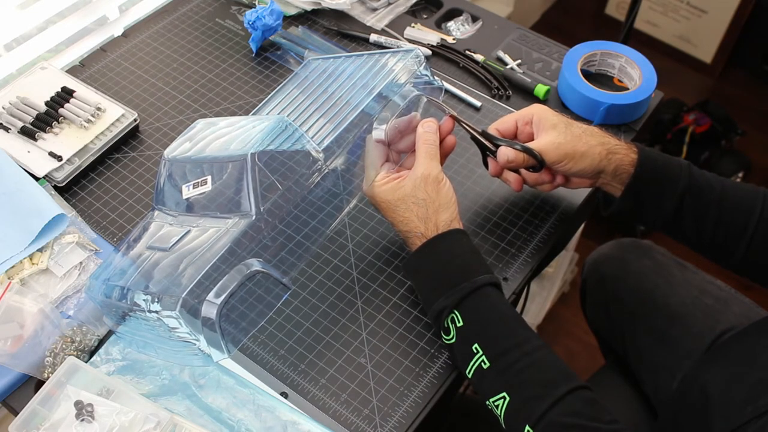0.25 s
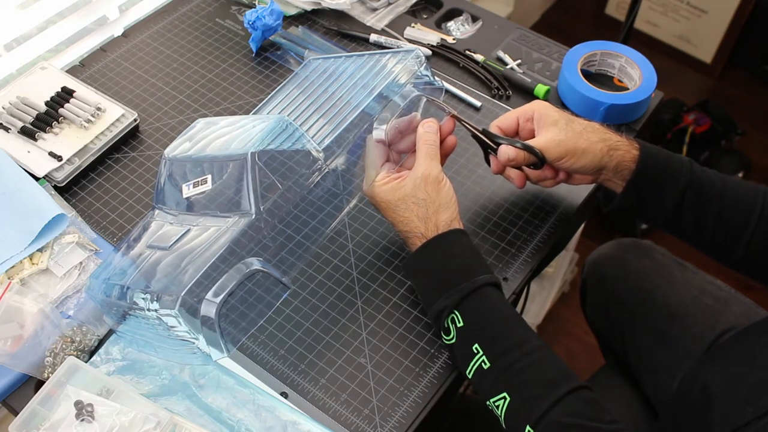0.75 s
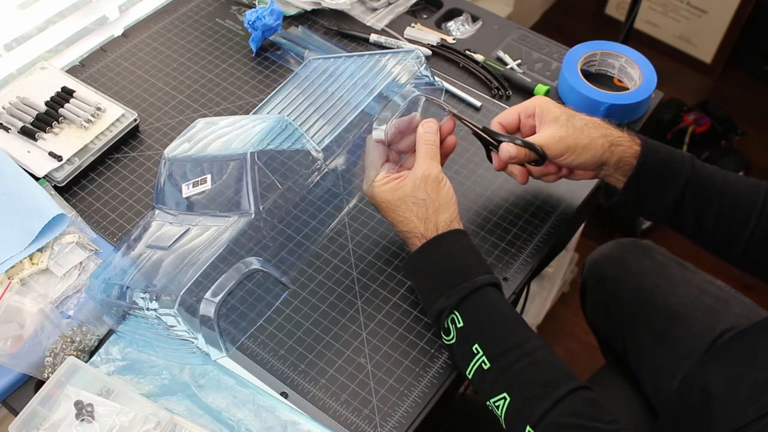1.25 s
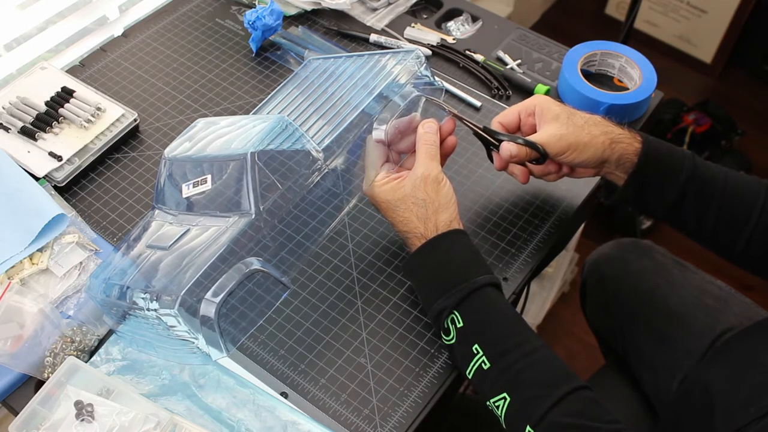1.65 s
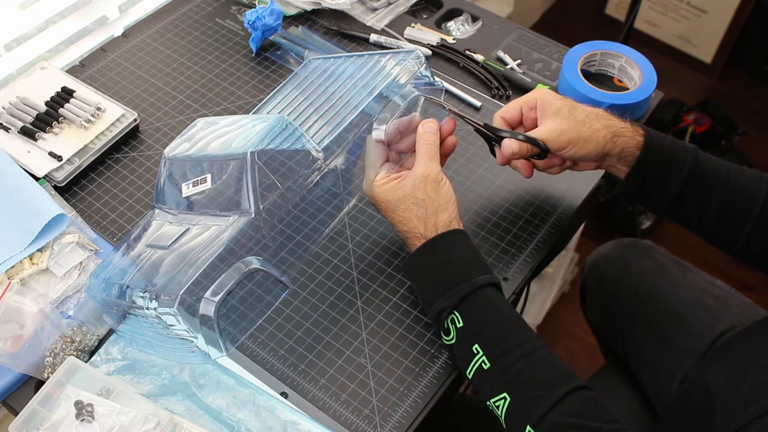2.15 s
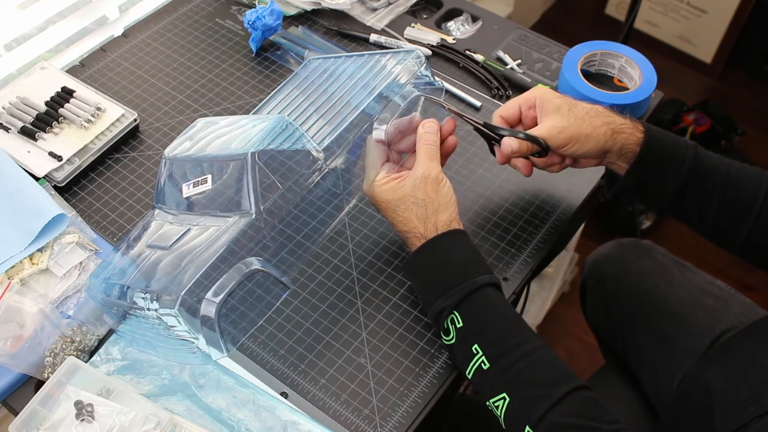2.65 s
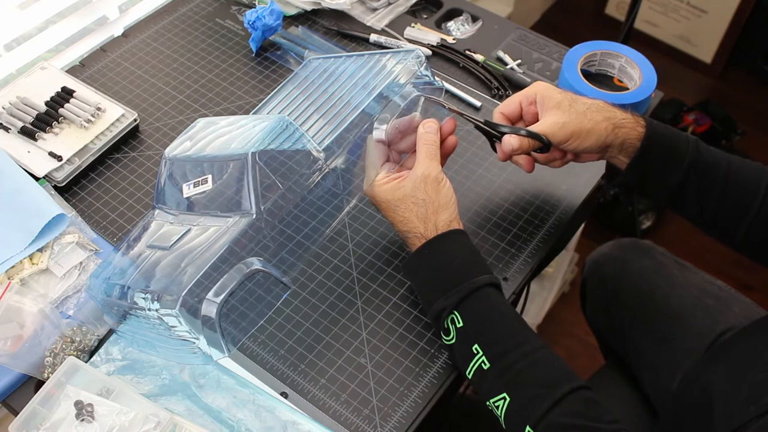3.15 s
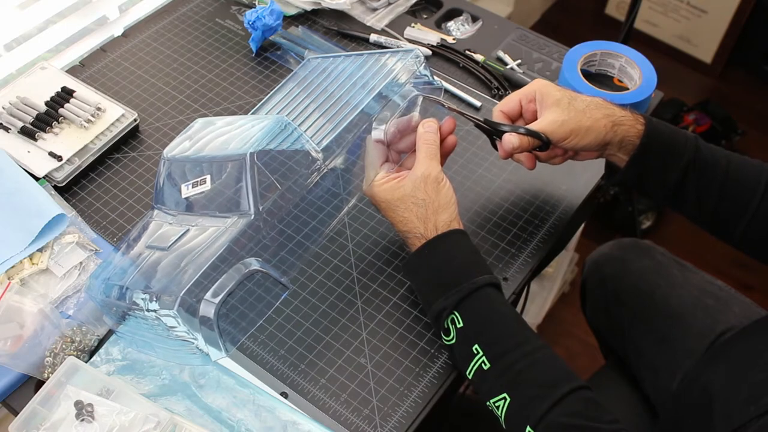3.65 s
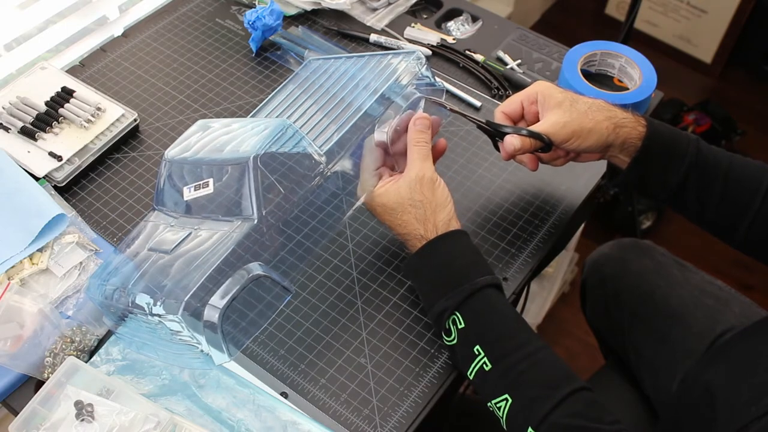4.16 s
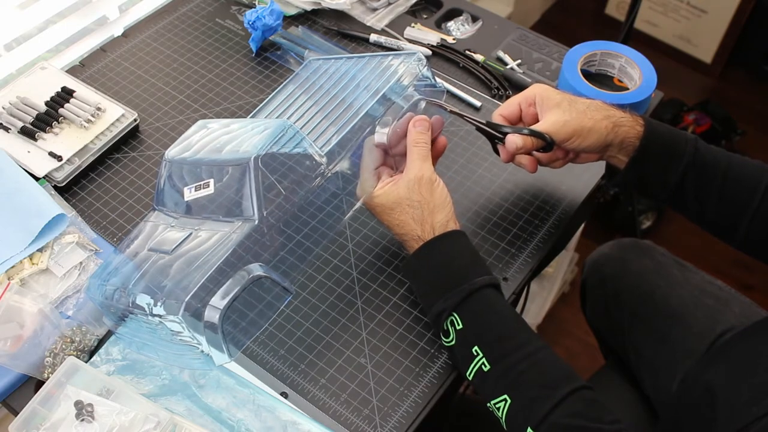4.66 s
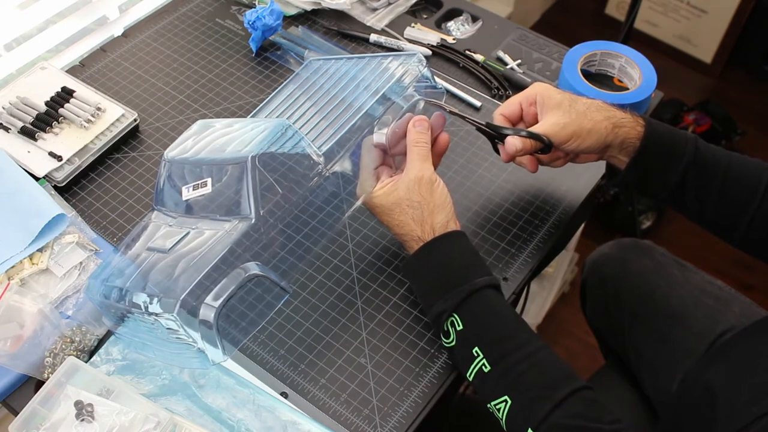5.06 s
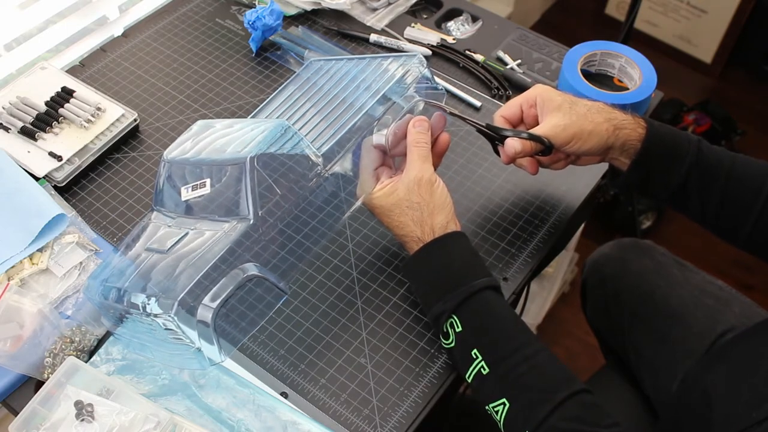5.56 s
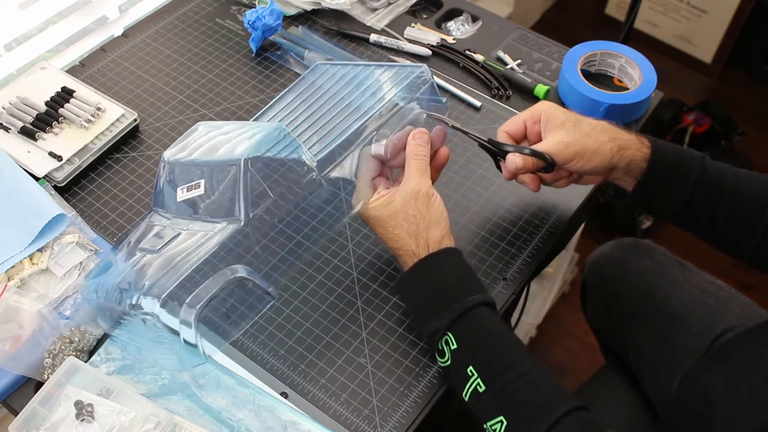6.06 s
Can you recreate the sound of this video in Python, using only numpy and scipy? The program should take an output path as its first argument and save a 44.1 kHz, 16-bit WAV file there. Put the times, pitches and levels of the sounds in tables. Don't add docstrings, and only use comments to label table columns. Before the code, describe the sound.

Close view of small scissors cutting a thin, hollow plastic shell on a workbench. Dull knocks and tiny ticks come in scattered clusters, with brief bright rasps and sharp cracks. Stronger bites come past the middle, then a sparse lull, then the loudest hollow rattle at the end. Quiet room, faint steady fan hum, light reverberation and soft microphone hiss.

```python
import sys
import numpy as np
from scipy import signal
from scipy.io import wavfile
from scipy.ndimage import uniform_filter1d

SR = 44100
rng = np.random.default_rng(int(sys.argv[2]) if len(sys.argv) > 2 else 0)


def ratio(d):
    e = np.asarray(d, float) / 20
    return 10 ** e


def file_out(sig):
    cols = np.atleast_2d(sig).T
    lim = np.clip(cols, -1, 1)
    pcm = np.round(lim * 32767).astype(np.int16)
    wavfile.write(sys.argv[1], SR, pcm)


N = 277389


def evened(x):
    return x / np.sqrt(np.mean(x ** 2) + 1e-20)


def read(points, hz):
    f, value = np.transpose(points)
    return np.interp(np.log(hz + 1), np.log(f + 1), value)


def add(mix, s, sound):
    part = mix[..., round(s * SR):][..., :sound.shape[-1]]
    part += sound[..., :part.shape[-1]]


def band(x, low_hz, high_hz):
    edges = np.clip([low_hz, high_hz], 20, 0.4 * SR)
    return signal.sosfilt(signal.butter(2, edges, "bandpass", fs=SR, output="sos"), x)


def drift(rate_hz):
    t = np.arange(0, N + 256, 256) / SR
    rates = np.geomspace(rate_hz / 20, rate_hz, num=12)
    slow = sum(np.sin(2 * np.pi * (f * t + rng.random())) / np.sqrt(f) for f in rates)
    return np.interp(np.arange(N) / SR, t, evened(slow))


def air(spectrum, patchy_db, swell_db):
    frames, hz = N // 512 + 5, np.fft.rfftfreq(2048, 1 / SR)
    a, b, patches = rng.standard_normal((frames, len(hz), 3)).T
    patches = uniform_filter1d(patches, size=12, axis=0)
    patches = evened(uniform_filter1d(patches, size=8, axis=1))
    swell = np.resize(drift(4)[::512], frames) / (1 + (hz[:, None] / 1200) ** 2)
    level_db = read(spectrum, hz)[:, None] + patchy_db * patches + swell_db * swell
    z = (a + 1j * b) * ratio(level_db)
    return evened(signal.istft(z, nperseg=2048, noverlap=1536)[1][:N])


# (frequency [Hz], density [dB per Hz])
HISS_SPECTRUM = [(15, -21), (25, 0), (363, -10.5), (439, -11.5), (962, -11), (12900, -9), (16000, -11.5)]


def hiss():
    return ratio(-58.5) * air(HISS_SPECTRUM, patchy_db=0, swell_db=0)


# (frequency [Hz], density [dB per Hz])
TONE_SPECTRUM = [(15, -33), (25, -33), (141, -8.5), (277, -1), (335, -8), (394, -4), (439, -4.5), (516, -1),
                 (641, -9), (840, -7), (962, -12), (1790, -16.5), (2910, -23), (13200, -27), (16000, -27.5)]


def room_tone():
    return ratio(-48.5) * air(TONE_SPECTRUM, patchy_db=1.83, swell_db=-2.35)


# (frequency [Hz], level [dB rms])
FAN_LINES = [(48.4, -66.5), (290.7, -61.5), (387.6, -55.5), (495.3, -63), (1712, -72.5), (1820, -69.5),
             (2030, -95.5)]


def fan():
    t = np.arange(N) / SR
    hum = np.zeros(N)
    for hz, db in FAN_LINES:
        level = ratio(db + 0.5 + 1.05 * drift(15))
        hum += level * np.sin(2 * np.pi * hz * t + 0.82 * drift(2.5))
    return hum


# (peak time [s], level [dB], swell [s])
THUMPS = [
    (3.43, -53, 0.041),
    (3.71, -49, 0.058),
    (3.9, -39, 0.033),
    (6.16, -40, 0.073),
]


def bench():
    t = np.arange(N) / SR
    level = ratio(-63 + 0.5 * drift(8))
    for s, db, swell in THUMPS:
        level += ratio(db) * np.exp(-((t - s) / swell) ** 2)
    rumble = band(rng.standard_normal(N), 31.4, 110)
    return level * evened(band(rumble, 31.4, 122))


# (frequency [Hz], reverberation time t60 [s])
ROOM_DECAY = [(120, 0.73), (350, 0.49), (900, 0.72), (2300, 0.69), (6000, 0.56), (14000, 0.13)]


def room(x):
    taps = np.zeros((3, SR // 2))
    at = np.arange(160, SR // 2 - 20, 20)
    places = at + rng.integers(0, 20, (3, len(at)))
    np.put_along_axis(taps, places, rng.choice([-1., 1.], (3, len(at))), axis=1)
    hz, t, z = signal.stft(taps, SR, nperseg=256)
    tails = signal.istft(z * ratio(-60 * t / read(ROOM_DECAY, hz)[:, None]), SR, nperseg=256)[1]
    phase = 5 * np.arange(N) / SR + np.arange(3)[:, None] / 3
    turn = np.sqrt(2 / 3) * np.cos(2 * np.pi * phase)
    return signal.fftconvolve(x * turn, tails / np.linalg.norm(tails[0]), axes=1)[:, :N].sum(0)


def spray(t, luck, grit_db, rise, t60, hold):
    noise, grit = luck
    grains = noise * ratio(grit_db * evened(uniform_filter1d(grit, size=30)))
    return grains * (1 - np.exp(-t / rise)) * ratio(-60 * (t / t60) ** hold)


# (time [s], peak level [dB], centre frequency [Hz], rise [s], t60 [s])
SHEARS = [(0.274, -34.5, 3700, 0.016, 0.15), (.535, -49, 11100, .01, .11), (.959, -35, 4440, .034, 0.081),
          (1.756, -32, 4520, 0.025, 0.09), (2.549, -32, 9000, 0.0092, 0.032),
          (3.379, -27.5, 5060, 0.0066, 0.067), (3.871, -26, 6900, .0061, 0.08),
          (3.906, -42.5, 8100, .01, 0.075), (3.97, -40, 8000, .0052, 0.049), (5.72, -35.5, 6750, 0.78, 1.1),
          (6.095, -37, 5900, .02, 0.13)]


def shears():
    out, t = np.zeros(N), np.arange(SR // 3) / SR
    spread = 2 ** 0.99
    for s, db, hz, rise, t60 in SHEARS:
        luck = rng.standard_normal((2, len(t)))
        rasp = spray(t, luck, grit_db=0.5, rise=rise, t60=t60, hold=1.5)
        add(out, s, ratio(db) * band(rasp, hz / spread, hz * spread))
    return out


# (time [s], high part level [dB], low over high [dB], middle over high [dB], t60 [s])
CRACKS = [(.143, -48, -0.5, -17, 0.02), (.326, -41, 2, -6, 0.021), (1.7837, -51, -1, -14, 0.017),
          (2.5586, -33.5, 3, -12, 0.019), (3.146, -59, 12.5, -12, 0.027), (3.588, -28, -11, -5, 0.018),
          (3.8693, -33.5, 5.5, -16, 0.023), (3.8882, -38, 4.5, -8, 0.033), (3.915, -54, 8, 0, 0.033),
          (3.95, -58, 10, -3, .026), (4.029, -47, 4, -24, 0.04), (4.769, -50.5, -2.5, -19, .026),
          (5.255, -52, -9, 1, 0.02), (6.0668, -54.5, 3, -14, 0.055), (6.0887, -60, 7, -2, .036),
          (6.1186, -45.5, -3, -3, 0.021), (6.1319, -54, 8, -7, .023), (6.1542, -55.5, 5, 6, 0.021),
          (6.1822, -68, 9, 8, .026), (6.203, -61, -1, -3, 0.03)]
# (time [s], high part level [dB], low over high [dB])
TICKS = [(0.439, -51.5, -0.5), (.5483, -50.5, -7), (.5648, -56, -1), (0.9912, -57.5, 5), (1.1123, -55, -11),
         (1.1696, -57, -3), (1.2487, -59, -3), (1.3503, -59, -4), (1.9854, -59, -11), (2.129, -52.5, -3.5),
         (2.2146, -60, -10), (2.538, -47, -5), (2.7661, -53, -6), (2.841, -54, -12), (2.8621, -57, -13),
         (3.578, -49, -4), (3.583, -40, -6), (4.7526, -63, 3)]
CRACK_EDGES = (2500, 6000, 9500, 14500)


def cracks():
    out, t = np.zeros(N), np.arange(SR // 10) / SR
    crack_snap, tick_snap = 5.3, 18
    tick_middle_db, tick_t60 = -21, 0.03
    rows = [(*row, crack_snap) for row in CRACKS]
    rows += [(*row, tick_middle_db, tick_t60, tick_snap) for row in TICKS]
    for s, db, low_db, middle_db, t60, snap in rows:
        luck = rng.standard_normal((2, len(t)))
        burst = spray(t, luck, grit_db=7.0, rise=0.00019, t60=t60, hold=2.1)
        burst[4] += snap
        burst /= np.sqrt(np.mean(burst[:260] ** 2))
        parts = zip((low_db, middle_db, 0), CRACK_EDGES, CRACK_EDGES[1:])
        for k, (part_db, low, high) in enumerate(parts):
            per_width = np.sqrt(SR / 2 / (high - low))
            add(out, s, (-1) ** k * ratio(db + part_db) * band(burst, low, high) * per_width)
    return out


# (time [s], peak level [dB], deep modes [dB], hardness [dB])
TAPS = [(.043, -33.5, -1, -8), (.144, -32, -21, -26), (.151, -21.5, -9, -19), (.326, -25, 1, -1.5),
        (.334, -29.5, -21, 2), (.44, -34, -2, -6), (.454, -33, 1, -19), (.562, -32, -17, -17),
        (.582, -29.5, -34, -33), (1.109, -32, -19, -15.5), (1.176, -30.5, -12, -13.5),
        (1.248, -34, -12, -13), (3.861, -26, 15, -9), (1.787, -26.5, -3, -0.5), (1.812, -30.5, 2.5, -5.5),
        (2.134, -46, -5, -8), (2.338, -20.5, -7, -21.5), (2.366, -24, -14, -29), (2.539, -35, -22, -3.5),
        (2.558, -21.5, -7, -1), (1.586, -30, -14, -28), (3.145, -28.5, -11, -17), (4.031, -25, 0.5, -14),
        (4.256, -35, 4, -8.5), (4.749, -29, 0, -17), (4.77, -31.5, -4, -13), (5.604, -36.5, -5, -16),
        (5.821, -39, -33, -25), (5.911, -31, -24, -29), (6.015, -13.5, 0, -30)]
# (start time [s], length [s], force [dB], deep modes [dB], hardness [dB])
CHATTERS = [
    (0.268, .05, -20, -45, -15.5),
    (1.759, 0.024, -38, -2, 4),
    (3.38, 0.033, -10.5, -3, -8),
    (6.058, 0.025, -14, 4.5, -17.5),
    (6.084, 0.029, -8, -11, -17),
    (6.179, 0.045, -20, 0, -15),
]
# (start time [s], length [s], force [dB], deep modes [dB], hardness [dB])
RATTLES = [
    (0.959, 0.056, -28.5, -15.5, -13.5),
    (1.558, .012, -19, -6, -26),
    (3.676, 0.021, -20, 3.5, -14),
    (3.868, 0.049, -10.5, 0.5, -9.5),
    (6.131, 0.039, -4.5, -5, -19),
    (.352, 0.0091, -27, 3, -26),
]


def blows():
    rows = list(TAPS)
    runs = [(*row, -6, 0.44, 0) for row in CHATTERS]
    runs += [(*row, -1.5, 0.17, -4) for row in RATTLES]
    let_go_db = -32
    for s, length, db, deep_db, hard_db, first_db, bite, sag_db in runs:
        gap_luck, force_luck = rng.standard_normal((2, 6))
        gaps = 0.011 * np.exp(0.149 * gap_luck)
        after = np.cumsum(gaps) - gaps[0]
        force_db = np.interp(after / length, [0, bite, 1, 1.4], [first_db, 0, sag_db, let_go_db])
        levels_db = db + force_db + 0.5 * force_luck
        rows += [(s + a, level_db, deep_db, hard_db) for a, level_db in zip(after, levels_db)]
    return rows


# (frequency [Hz], level [dB], t60 [s])
SHELL_MODES = [(114, -18.5, 0.3), (146, -12.5, 0.11), (218.7, -5.5, 0.061), (256.8, -5, .12),
               (310.7, -1, 0.083), (354, -2, 0.064), (418.4, -4, 0.15), (442, -6.5, 0.074),
               (547, 0.5, 0.069), (618, -3, 0.26), (706.5, -1.5, 0.086), (747, -3.5, 0.073),
               (830, -4.5, 0.21), (889.4, 1.5, 0.1), (970, 1.5, 0.061), (1087, -6, 0.19),
               (1163, -0.5, 0.063), (1229, -2, 0.096), (1320, 5.5, 0.042), (1357, -1, 0.078),
               (1451, 2.5, 0.029), (1570, 0.5, 0.051), (1735, -2.5, 0.037), (1940, -4.5, 0.025),
               (2160, 3.5, 0.013), (2337, -8.5, 0.027), (2620, -0.5, 0.0074), (3030, -10, 0.015),
               (3560, -12, 0.019)]
BLOW_HZ = (305, 490, 784, 1540, 3200)


def shell():
    hz, mode_db, t60 = np.transpose(SHELL_MODES)[:, :, None]
    out, n, t = np.zeros(N), np.arange(900), np.arange(SR // 7) / SR
    boom_hz, boom_db, boom_t60 = 482.8, 4, 0.1
    for s, db, deep_db, hard_db in blows():
        if db < -50:
            continue
        grip, lean = rng.standard_normal(2)
        place, bend = rng.standard_normal((2, len(hz), 1))
        slips = 0.024 * rng.standard_normal(len(n)) ** 3 * np.exp(-n / (0.0059 * SR))
        slips[0] = 1

        beside_db = 0.26 * hard_db
        middle_db = hard_db + 3.5 * lean
        upper_db = hard_db - 1 - 3.5 * lean
        colours = (deep_db, beside_db, middle_db, upper_db, upper_db + 3.5)
        colour_db = read(list(zip(BLOW_HZ, colours)), hz)

        decay = ratio(mode_db + colour_db + place - 60 * t / t60)
        modes = decay * np.sin(2 * np.pi * hz * (1 + 0.016 * bend) * t)
        ring = (np.sign(bend) * modes).sum(0)
        boom = ratio(boom_db - 60 * t / boom_t60) * np.sin(2 * np.pi * boom_hz * (1 + 0.011 * grip) * t)
        rise = 1 - np.exp(-t / (0.0005 * ratio(-upper_db / 2)))
        add(out, s - 0.001, ratio(db - 10) * signal.fftconvolve(rise * (boom + ring), slips))
    return signal.sosfilt(signal.butter(3, 90, "highpass", fs=SR, output="sos"), out)


def scene():
    body, cut = shell(), cracks() + shears()
    middle = body + cut + room(ratio(-7) * body + ratio(-12) * cut)
    middle += room_tone() + fan() + bench()
    side = hiss()
    return np.array([middle + side, middle - side])


def roll_off(x):
    return signal.sosfilt(signal.butter(12, 16470, fs=SR, output="sos"), x)


def record(dry):
    low_pass = signal.firwin(1501, 15800, window=("kaiser", 9), fs=SR)
    limited = signal.oaconvolve(dry, low_pass[None], "same")
    return roll_off(limited)


dry = scene()
out = record(dry)
file_out(out)
```